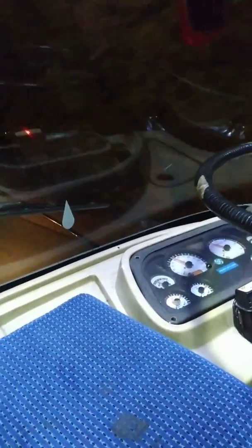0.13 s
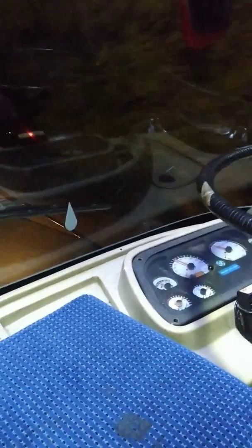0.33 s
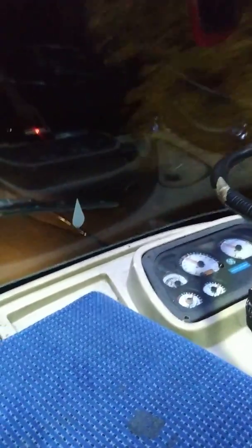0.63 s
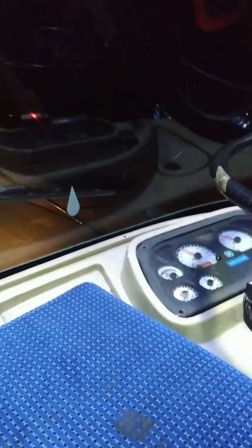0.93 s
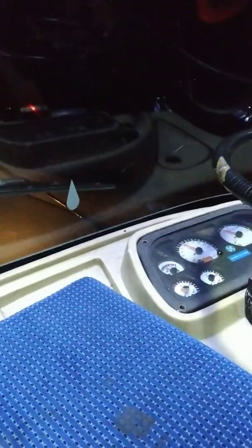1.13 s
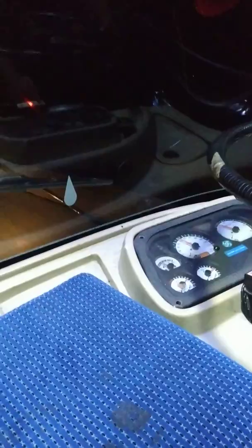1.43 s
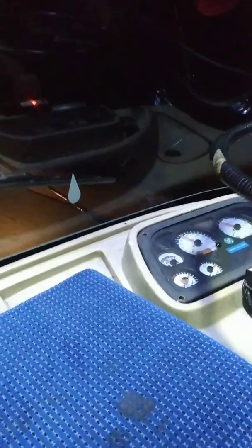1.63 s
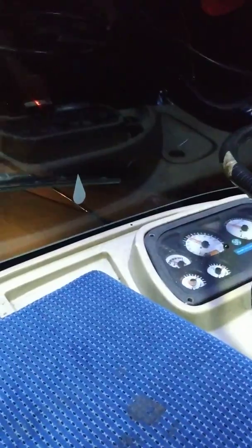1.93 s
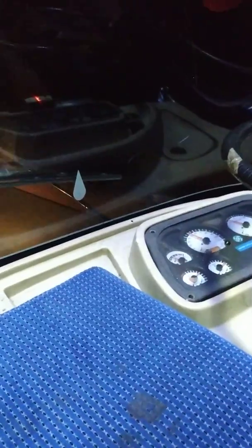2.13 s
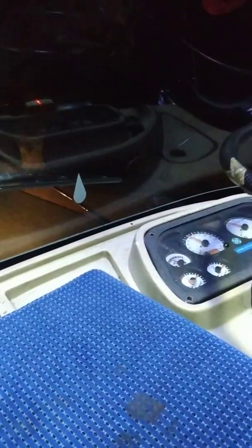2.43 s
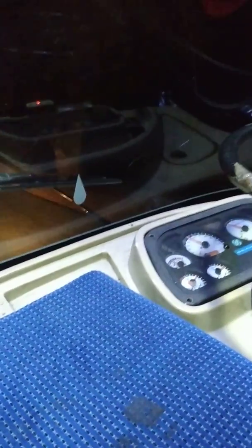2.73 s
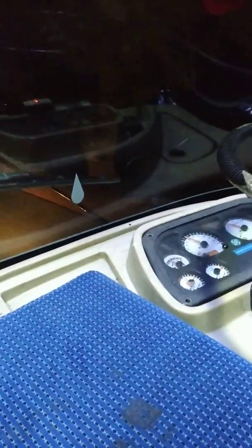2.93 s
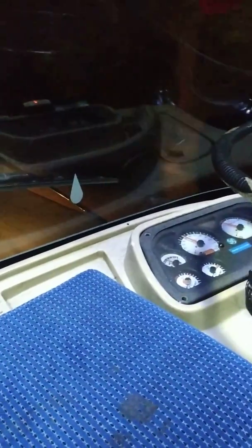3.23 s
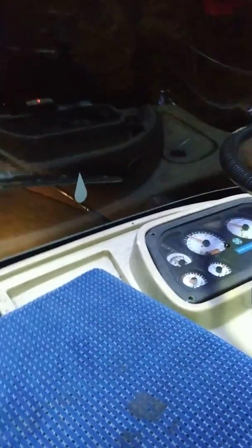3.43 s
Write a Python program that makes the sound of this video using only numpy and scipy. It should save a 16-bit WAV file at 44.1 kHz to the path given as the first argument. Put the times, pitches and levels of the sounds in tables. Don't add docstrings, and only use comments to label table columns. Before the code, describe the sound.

Inside a large moving vehicle's cab, an air horn toot cuts off at once; low booms, tyre roar and wind hiss continue until a long brassy blast dominates, ducking the background at the close stereo microphone.

```python
import sys
import numpy as np
from scipy import signal
from scipy.fft import rfft, irfft, next_fast_len
from scipy.io import wavfile
from scipy.ndimage import uniform_filter1d, minimum_filter1d, map_coordinates

SR = 44100
rng = np.random.default_rng(int(sys.argv[2]) if len(sys.argv) > 2 else 0)


def inscribe(sig):
    pcm = np.round(np.clip(np.atleast_2d(sig).T, -1, 1) * 32767)
    wavfile.write(sys.argv[1], SR, pcm.astype(np.int16))


def makeup_ratio(level_db):
    decades = np.asarray(level_db, float) / 20
    return 10 ** decades


N = 158319
TIME = np.arange(N) / SR
HORN_HZ, HORN_DB = 343.85, 5
SIDE = np.array([[.5], [-.5]])


# start in seconds, length in seconds, start-up ring in dB.
BLASTS = [
    (-.013, .068, 4.5),
    (2.482, 2.0, 0),
]


def horn():
    out = np.zeros((2, N))
    for start_s, length_s, ring_db in BLASTS:
        first = max(round(start_s * SR), 0)
        last = min(round((start_s + length_s + .3) * SR), N)
        times = TIME[first:last]
        since = times - start_s
        out[:, first:last] += direct_sound(since, length_s)
        out[:, first:last] += bell_ring(since, ring_db)
        out[:, first:last] += roadside_echoes(times, since, length_s)
    return makeup_ratio(HORN_DB) * out


def pressure(since, length_s, attack_s, release_s):
    build = 1 - np.exp(-np.clip(since, 0, None) / attack_s)
    bleed = np.exp(-np.clip(since - length_s, 0, None) / release_s)
    return build * bleed


# multiple of the horn's pitch, level in dB, left-right difference in dB, left lead in radians.
DIRECT = [(1, -1, -3, -0.0), (2, -3.5, 0, -1.3), (3, -2.5, 2.5, 0.5), (4, -12.5, 2, -3), (5, -11, 6, -2.0),
          (6, -17, -3, 0.75), (7, -10.5, 0.5, -1.2), (8, -20, -7.5, 3.5), (9, -22, -10, -1.7),
          (10, -26, -10, 0.9), (11, -27, -4.5, 3.0), (12, -24, 8, 4.5), (13, -22, 1, -2)]


def direct_sound(since, length_s):
    out = np.zeros((2, len(since)))
    air = pressure(since, length_s, attack_s=.012, release_s=.018)
    turn = 2 * np.pi * HORN_HZ * since
    spread_s = .0006
    for multiple, db, pan_db, lead in DIRECT:
        k = round(multiple)
        late = 2 * np.pi * HORN_HZ * spread_s * k * (k - 1) / 10
        swell = air ** (1 + .6 * min(k - 1, 4))
        out -= makeup_ratio(db + pan_db * SIDE) * swell * np.cos(k * turn - late + lead * SIDE)
    return out


def bell_ring(since, ring_db):
    ring_hz, ring_t60_s, rise_s = 376, .25, .004
    _, db, pan_db, _ = DIRECT[0]
    fade = makeup_ratio(ring_db - 60 * since / ring_t60_s) * (1 - np.exp(-since / rise_s))
    return makeup_ratio(db + pan_db * SIDE) * fade * np.cos(2 * np.pi * ring_hz * since)


# frequency in Hz, level of one overtone in dB.
ECHOES = [(340, -28), (1000, -22), (2000, -20.5), (3500, -28), (6000, -29), (10000, -29), (15500, -35)]


def roadside_echoes(times, since, length_s):
    out = np.zeros((2, len(since)))
    far = pressure(since, length_s, attack_s=.03, release_s=.03)
    turn = 2 * np.pi * HORN_HZ * since
    for k in range(1, 46):
        fades_per_s = 2.5 + .35 * k
        fades = np.array([wobble(fades_per_s, times) for _ in range(4)])
        tone = fades[:2] * np.cos(k * turn) + fades[2:] * np.sin(k * turn)
        out += makeup_ratio(along(ECHOES, k * HORN_HZ)) * far * tone
    return out


# middle in seconds, length in seconds, cab mode in Hz, level in dB.
BOOMS = [(.22, .4, 20, -15), (.38, .75, 55, -14), (.62, .5, 24, -10), (.78, .25, 50, -14.5),
         (1.07, .55, 43, -6.5), (1.33, .45, 20, -8.5), (1.85, .4, 21, -15.5), (2.05, .4, 55, -17.5),
         (2.15, .45, 20, -9.5), (2.43, .3, 19, -10), (2.9, .5, 21, -13.5), (3.3, .4, 43, -13.5)]


def cab_booms():
    return swells(BOOMS, unsteady=.5)


# middle in seconds, length in seconds, pitch in Hz, level in dB.
DRONES = [
    (.3, .5, 155, -23.5),
    (.62, .5, 232, -27.5),
    (.92, .3, 212, -25.5),
    (1.9, .6, 213, -28.5),
    (2.38, .3, 164, -25.5),
]


def engine_drone():
    return swells(DRONES, unsteady=.8)


def swells(rows, unsteady):
    out = np.zeros(N)
    for middle_s, length_s, hz, db in rows:
        shape = np.cos(np.pi * np.clip((TIME - middle_s) / length_s, -.5, .5))
        level = makeup_ratio(db + 2 * unsteady * wobble(12)) * np.sqrt(2)
        out += level * shape * np.sin(2 * np.pi * hz * TIME + unsteady * wobble(6))
    return out


# time in seconds, roar level in dB.
ROAD = [(0.2, -24.5), (0.22, -23), (1.02, -26), (1.13, -32.5), (1.16, -19.5), (1.2, -31.5), (1.26, -25),
        (1.28, -30), (1.67, -23), (2.0, -24.5), (2.02, -27.5), (2.04, -26), (2.42, -25.5), (2.45, -24.5)]
# frequency in Hz, level in dB.
ROAR = [(150, -46), (280, -4.5), (420, 0.5), (700, -4.5), (1500, -9), (3400, -15.5), (9000, -30),
        (16000, -45)]


def road_roar():
    seconds, db = np.transpose(ROAD)
    level_db = np.interp(TIME, seconds, db) + .8 * wobble(9)
    return makeup_ratio(level_db) * rush(ROAR, patchy_db=0.82)


# frequency in Hz, level in dB.
RUMBLE = [(8, -22), (18, -2), (50, -5), (90, -12.5), (150, -11), (190, -18), (240, -14), (500, -39)]


def cab_rumble():
    return makeup_ratio(-16.5 + 1.5 * wobble(4)) * rush(RUMBLE, patchy_db=1.17)


# frequency in Hz, likeness (1 the same, 0 unrelated).
ALIKE = [(60, 0.99), (180, 0.92), (550, 0.59), (1650, -0.02), (4970, -0.02), (15000, 0.01)]


def rush(spectrum, patchy_db):
    grains = signal.stft(rng.standard_normal((2, N + 512)), nperseg=512)[2]
    field = rng.standard_normal(grains.shape[1:])
    field = uniform_filter1d(field, size=8, axis=0)
    field = uniform_filter1d(field, size=10, axis=1)
    pair = signal.istft(grains * makeup_ratio(patchy_db * unit(field)), nperseg=512)[1]
    size = next_fast_len(N + 8192)
    hz = np.fft.rfftfreq(size, 1 / SR)
    angle = np.arccos(np.clip(along(ALIKE, hz), -1, 1)) / 2
    shares = [np.cos(angle), np.sin(angle)]
    mid, side = irfft(rfft(pair, size) * makeup_ratio(along(spectrum, hz)) * shares, size)[:, :N]
    return unit(np.array([mid + side, mid - side]))


def unit(x):
    return x / np.sqrt(np.mean(np.abs(x) ** 2) + 1e-20)


def along(points, hz):
    f, v = np.transpose(points)
    return np.interp(np.log(hz + 1), np.log(f + 1), v)


def wobble(rate, times=TIME):
    knots = rng.standard_normal(400)
    return map_coordinates(knots, [times[::32] * rate]).repeat(32)[:len(times)]


def scene():
    return horn() + cab_booms() + engine_drone() + road_roar() + cab_rumble()


def top_cut(x):
    return signal.sosfilt(signal.butter(12, 17000, fs=SR, output="sos"), x)


def record(dry):
    ceiling_db, recover_db_per_s = -1, 159
    hold, grip = max(round(.02 * SR), 3), max(round(.008 * SR), 3)
    peak_db = 20 * np.log10(np.abs(dry).max(0) + 1e-9)
    need_db = np.minimum(ceiling_db - peak_db, 0)
    held_db = minimum_filter1d(np.pad(need_db, (hold, 0), "edge"), hold, mode="nearest")
    held_db = held_db[hold // 2 + grip // 2:][:N]
    climb = recover_db_per_s * TIME
    gain_db = np.minimum.accumulate(held_db - climb) + climb
    gain_db = uniform_filter1d(gain_db, grip, mode="nearest")
    return top_cut(dry * makeup_ratio(gain_db))


dry = scene()
out = record(dry)
inscribe(out)
```